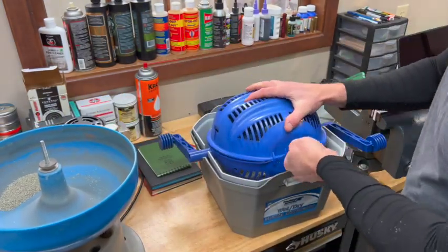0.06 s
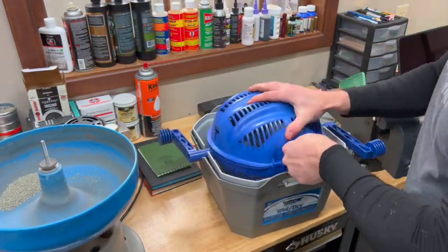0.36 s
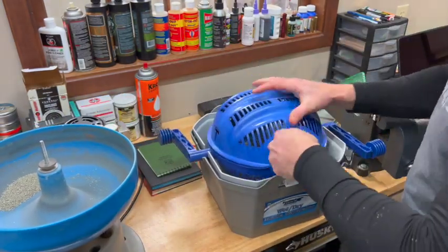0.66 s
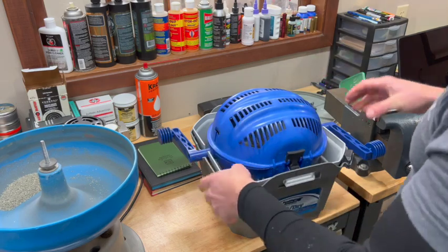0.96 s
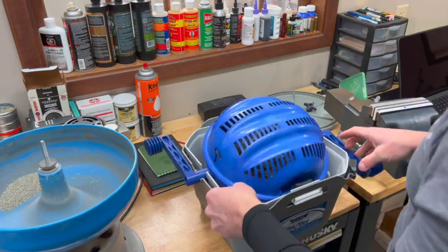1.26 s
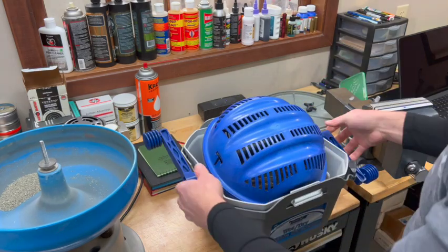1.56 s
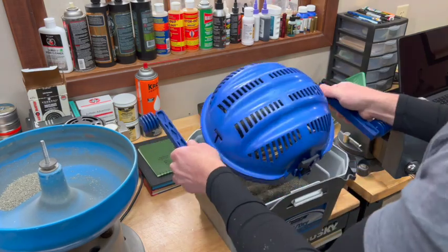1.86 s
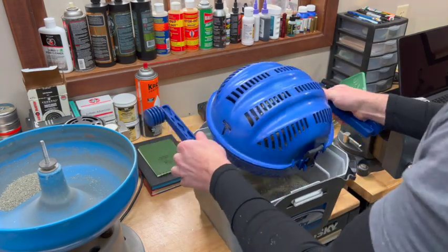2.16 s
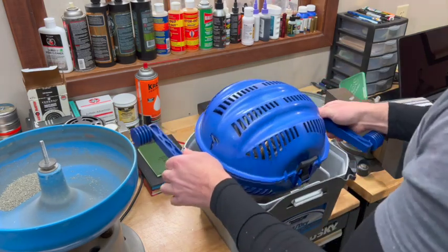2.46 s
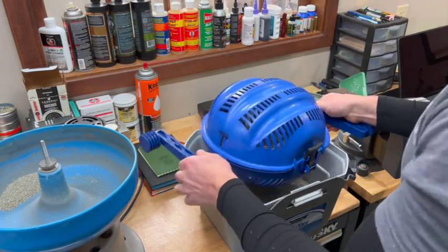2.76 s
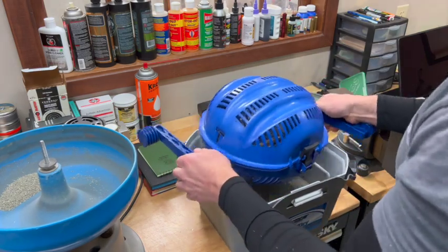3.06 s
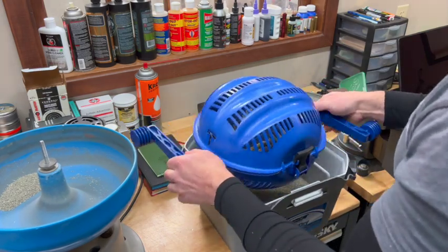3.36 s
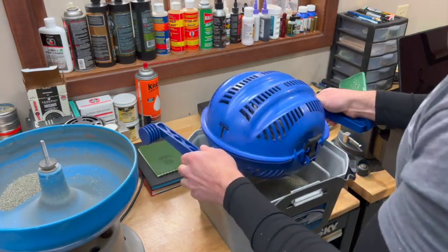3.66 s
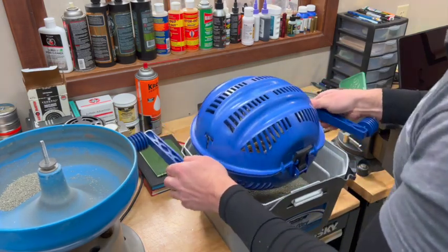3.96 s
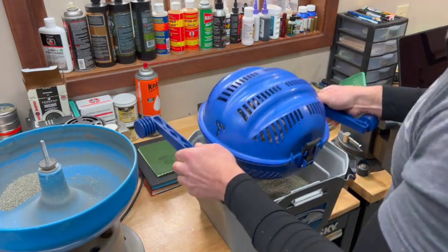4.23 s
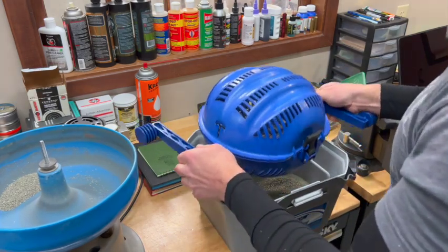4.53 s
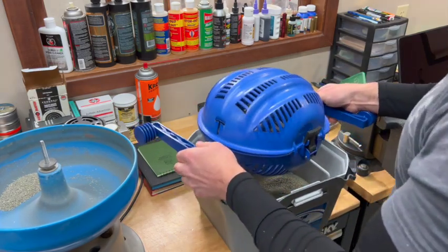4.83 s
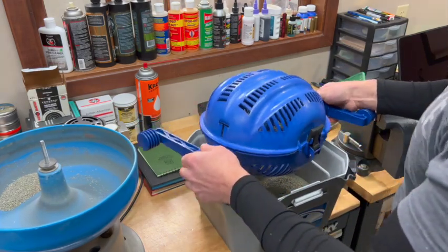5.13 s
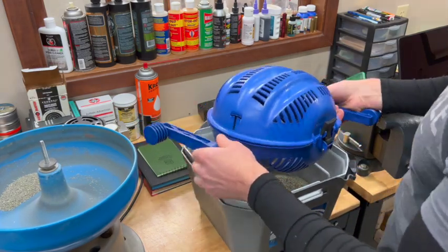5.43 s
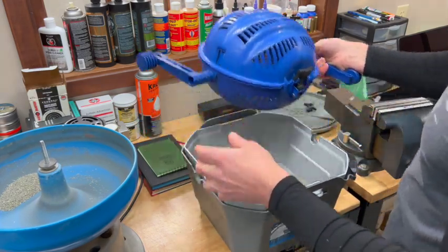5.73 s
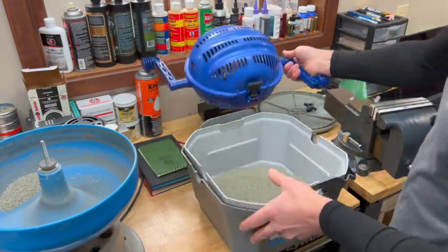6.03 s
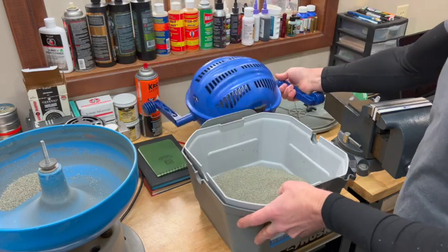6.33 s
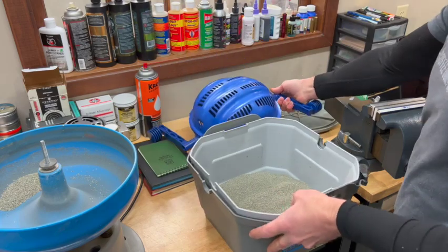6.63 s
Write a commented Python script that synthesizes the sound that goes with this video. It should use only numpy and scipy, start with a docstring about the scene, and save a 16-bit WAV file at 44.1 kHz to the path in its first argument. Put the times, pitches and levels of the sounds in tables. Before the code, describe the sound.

A plastic latch snaps, then brass cases rattle and clink in a turning plastic sifter, which is set down with a thump.

```python
"""Sifting brass cases

A slotted plastic ball full of brass cases is snapped shut, then turned and rocked above its bucket.
Its axles rub, the cases drum on the shell and clink together, and grit trickles out through the slots.
Then the ball is lifted off and set down on the workbench, bumping a lid that rings. Each hit is made of
fading tones or a short burst of noise. A small workshop echoes, with a faint fan hum behind it all."""
import sys
import numpy as np
from scipy import signal
from scipy.fft import rfft, irfft, next_fast_len
from scipy.io import wavfile

SR = 44100
rng = np.random.default_rng(int(sys.argv[2]) if len(sys.argv) > 2 else 0)


def to_wav(s):
    """Save 16-bit WAV."""
    ch = np.atleast_2d(s).T  # columns
    pcm = np.round(np.clip(ch, -1, 1) * 32767)  # PCM
    wavfile.write(sys.argv[1], SR, pcm.astype(np.int16))


N = 295012

# When things happen. All levels are relative: the functions turn them up or down.
# latch, cranks and ball knock on bucket and bench: t/s, then level/dB of clack, thump, hollow and snap
KNOCK_HITS = [(0.095, -39.5, -33, -38.5, -50), (0.325, -78, -43, -63, -85), (0.426, -20.5, -38, -30, -30.5),
              (0.599, -45, -41, -43.5, -66), (0.646, -42.5, -48, -50, -51), (0.987, -44.5, -52.5, -73, -70),
              (1.037, -47, -37.5, -47.5, -54.5), (1.322, -23, -57, -35.5, -57),
              (1.381, -23, -41, -33.5, -43), (1.703, -45, -34.5, -61, -54.5), (1.743, -39, -43, -71, -58),
              (1.84, -27, -36, -38, -43.5), (1.858, -30, -25, -19.5, -47), (3.046, -30, -28.5, -30, -49.5),
              (5.593, -38.5, -75, -56, -61.5), (5.655, -46.5, -78, -58, -53),
              (5.945, -30, -60, -49.5, -39.5), (6.067, -34, -39, -44, -32), (6.077, -26.5, -25.5, -40, -29),
              (6.092, -21, -23, -28, -24.5), (6.398, -29, -58, -59, -63), (6.535, -27.5, -63.5, -46, -68),
              (6.579, -25, -40, -36, -42.5), (6.62, -15, -13.5, -23, -30)]
# the axles turn in the bucket's notches: t/s, length/s, rub level/dB, rub growth/dB, grit level/dB
AXLE_TURNS = [(1.149, .29, -38.5, -0.5, -69.5), (1.69, .28, -47.5, 0, -78.5), (5.54, 0.47, -64, 9, -100),
              (5.914, 0.063, -50, -9, -97.5), (6.45, .23, -49.5, 15.5, -83)]
# how hard the heap of cases tumbles: t/s, level/dB
TUMBLE_CURVE = [(1.99, -45.5), (2.07, -38), (2.13, -21.5), (2.3, -28.5), (2.42, -20), (2.9, -26.5),
                (3.3, -23.5), (3.39, -27.5), (3.5, -24), (3.98, -21.5), (4.12, -24), (4.22, -36.5)]
# the loudest cases falling on the shell: t/s, ring level/dB, crack level/dB
CASE_FALLS = [(2.113, -41, -47), (2.133, -41, -36.5), (2.202, -40, -36.5), (2.264, -22.5, -36),
              (2.427, -22, -48), (2.473, -27, -38.5), (2.656, -19.5, -36.5), (2.757, -15, -30),
              (2.79, -17.5, -31), (2.839, -13.5, -37.5), (2.886, -19.5, -30.5), (2.912, -22, -49),
              (2.964, -15, -31), (3.002, -21, -37), (3.085, -17, -44), (3.108, -16, -37.5),
              (3.188, -12.5, -25), (3.264, -13.5, -36), (3.322, -19.5, -30.5), (3.34, -16, -36),
              (3.447, -16.5, -22.5), (3.534, -19, -36), (3.646, -13.5, -32), (3.682, -19, -36.5),
              (3.72, -23.5, -30.5), (3.743, -14, -34), (3.764, -16, -25.5), (3.891, -26, -35.5),
              (3.929, -18, -35.5), (4.082, -21.5, -31.5), (4.218, -25.5, -67.5), (4.291, -13.5, -36),
              (4.303, -27.5, -31), (4.314, -9.5, -24.5), (4.407, -26.5, -34), (4.487, -14, -21),
              (4.493, -9.5, -26.5), (4.507, -19.5, -31), (4.618, -15, -34), (4.652, -12, -26),
              (4.728, -21, -31), (4.784, -21.5, -48), (4.823, -20, -40.5), (4.864, -18, -40),
              (4.969, -16.5, -34.5), (4.982, -17, -27.5), (4.987, -13.5, -22), (5.078, -22, -48.5),
              (5.1, -21.5, -40), (5.354, -31.5, -63.5), (5.371, -29.5, -48), (5.414, -35.5, -52.5)]
# the brightest clinks of brass on brass: t/s, level/dB, f/Hz
CASE_CLINKS = [(2.1655, -27.5, 12000), (2.225, -26.5, 8000), (2.4598, -27.5, 11700), (2.6773, -23.5, 11600),
               (2.7112, -25, 11600), (2.807, -29.5, 11470), (2.8783, -20.5, 11600), (2.9637, -17, 11700),
               (2.9834, -23.5, 8020), (3.12, -32, 11730), (3.444, -28, 8030), (3.5533, -23.5, 11600),
               (3.6406, -31, 8050), (3.7349, -24.5, 11600), (3.8766, -25.5, 8060), (4.3244, -27, 11600),
               (4.4069, -29.5, 11600), (4.4244, -37.5, 11800), (4.4846, -26, 11600), (4.6039, -27, 11600),
               (4.6189, -25, 11600), (4.7316, -34, 11540), (4.7356, -39, 15600), (4.8115, -33.5, 11600),
               (4.9881, -31, 8040), (5.3727, -41.5, 8030), (5.4106, -45, 12200), (5.882, -41.5, 11600),
               (5.9484, -28, 8040), (6.5799, -45, 8070)]
# the ball bumps the lid: t/s, ring level/dB, bump level/dB
LID_HITS = [(6.092, -39.5, -38), (6.168, -35, -33.5)]

# Modes, the tones a thing rings with when hit: f/Hz, level/dB, t60/s (time to fade by 60 dB)
BENCH_MODES = [(86, -11, 0.14), (110.6, -16, 0.11), (146, -9.5, 0.16), (190, 4.5, 0.017)]
BUCKET_MODES = [(229, -2, 0.11), (268, -14.5, 0.18), (306, -6, 0.12), (383, 5.5, 0.051), (435, -5.5, 0.078),
                (474, -16, 0.011), (564, 4.5, 0.041), (682, 1.5, 0.033)]
SHELL_MODES = [(406.2, -11, 0.15), (616, -13.5, 0.1), (624.5, 2.5, 0.076), (727, -1.5, 0.075),
               (715.2, -11, 0.12), (773, -3.5, 0.08), (874, -9.5, 0.12), (1031, -8, 0.061),
               (1156, -5, 0.06), (1280, -3.5, 0.036), (1271, -9, 0.1), (1516, -12.5, 0.052),
               (1703, -5.5, 0.032), (1871, -12, 0.029), (2310, -26, 0.16), (2954, -24, 0.078),
               (3035, -23, 0.031)]
BRASS_MODES = [(8040, 2.5, 0.1), (8600, -14, .08), (11620, 8, 0.04), (12210, 3, .085), (15600, -2, 0.06)]
LID_MODES = [(616, -14, .9), (759, -19, .7), (1227, -16, .4), (1421, -14, .45), (1712, -14, .32),
             (1928, 3, .58), (2955, -9, .52), (4775, -21, .4)]

# Colours, how strong a sound is from bass to treble: f/Hz, level/dB
AIR_COLOUR = [(15, -57), (25, -10.5), (70, -6.5), (117, -6.5), (161, 3.5), (354, 10.5), (427, -10),
              (476, -3), (531, 2), (1260, -5.5), (2760, -15.5), (14400, -20.5), (16000, -18)]  # the room's steady hush
CLACK_COLOUR = [(300, -17), (800, 3), (1600, -2.5), (2300, -20.5), (3500, -26), (9000, -74.5)]  # the dull part of a plastic knock
SNAP_COLOUR = [(900, -77), (1800, 7.5), (2600, -2.5), (4800, 3), (7000, -2.5), (10000, -12.5), (16000, -18)]  # its bright part
LATCH_COLOUR = [(700, -14), (1200, 0), (1900, -6), (2400, 0), (3000, -2), (3600, -8), (4400, -2),
                (5400, -10), (6600, -24), (15000, -23)]  # the catch closing
AXLE_COLOUR = [(35, -65), (60, -20), (201, -4.5), (455, -1), (494, -5), (547, -1), (632, -4.5), (686, -4.5),
               (1170, -13.5), (3390, -30), (8000, -60), (10400, -49), (17600, -120)]  # an axle rubbing
GRIT_COLOUR = [(500, -19.5), (2000, -0.5), (5000, 4.5), (9000, -3), (15500, -2)]  # falling grains
CRACK_COLOUR = [(30, -59.5), (70, -46), (130, -11.5), (250, 8.5), (480, -3), (620, 0), (1700, 8.5),
                (2300, -5), (3100, 4.5), (4300, -8.5), (6300, -3), (9000, -13.5), (15500, -14.5)]  # brass on plastic
CHATTER_COLOUR = [(2000, -29.5), (6500, -4.5), (9500, -14.5), (11700, -12), (13000, -15.5), (16000, -17.5)]  # brass on brass
BUMP_COLOUR = [(40, 1), (130, -6), (700, 5.5), (2000, -4), (6000, -16.5), (15000, -41.5)]  # ball on lid
ECHO_COLOUR = [(40, -22.5), (200, 1.5), (600, 0), (1500, -2), (4800, -4), (7000, -4.5), (15000, -5.5)]  # the room's echo

# how long the workshop echoes: f/Hz, t60/s
ROOM_DECAY = [(100, 0.49), (700, 0.42), (2000, 0.64), (4800, 0.55), (8000, 0.4), (15000, 0.3)]

GRIP_S, SLIP_S = 0.019, 0.1  # a rub starts and dies away
SPILL_RISE_S, SPILL_FALL_S, SPILL_SHARE = 0.3, 0.27, 0.4  # grit runs fully for this share of a turn
ROLL_DB, TRICKLE_DB = -22, -37  # rubbing and grit that follow the tumble
DRUM_DB, TICK_DB, RIB_DB, JINGLE_DB = -10.5, -12, -12, -24  # small hits in the tumble
STRAY_RING_DB, STRAY_CRACK_DB = -4, -9.5  # lesser falls in the tumble
SURGES_PER_S, SURGE_DB = 14, 5
SETTLE_S, SETTLE_DB, SETTLE_DROP_DB = 0.11, -30.5, 15  # neighbours shift after a fall, ever more softly
ECHO_STEP_S, TOP_HZ = 0.4, 15900


def amp(db):
    """Turn decibels into a factor to multiply by."""
    return 10 ** (np.asarray(db) / 20)


def along(points, hz):
    """Read between (f/Hz, value) points, with octaves about evenly spaced."""
    f, values = np.transpose(points)
    return np.interp(np.log(hz + 1), np.log(f + 1), values)


def fade(t, t60):
    """Die away by 60 dB every t60 seconds."""
    return np.exp(-np.log(1000) * t / t60)


def colour(x, spectrum):
    """Give x the bass and treble of a colour table."""
    m = next_fast_len(len(x) + 4096)
    gain = amp(along(spectrum, np.fft.rfftfreq(m, 1 / SR)))
    return irfft(rfft(x, m) * gain, m)[:len(x)]


def noise(spectrum):
    """Coloured noise with an average strength (rms) of 1."""
    x = colour(rng.standard_normal(N), spectrum)
    return x / np.sqrt(np.mean(x ** 2) + 1e-20)


def highpass(x, hz):
    """Cut the bass that a thing is too small to give off."""
    return signal.sosfilt(signal.butter(4, hz, "highpass", fs=SR, output="sos"), x)


def add(track, start, sound):
    """Mix a sound into the track, start seconds in."""
    part = track[max(round(start * SR), 0):][:len(sound)]
    part += sound[:len(part)]


def pulses(times, sizes):
    """One sharp click for each hit."""
    return np.bincount(np.maximum(np.asarray(times) * SR, 0).astype(int), sizes, N)[:N]


def bursts(times, sizes, spectrum, t60, rise):
    """Each hit starts a quickly dying puff of coloured noise."""
    t = np.arange(SR // 2) / SR
    shape = fade(t, t60) * (1 - np.exp(-t / rise))
    power = signal.fftconvolve(pulses(times, sizes ** 2), shape ** 2)[:N]
    return np.sqrt(np.abs(power)) * noise(spectrum)


def ring(times, sizes, modes, scatter_db, detune=0, tunings=1):
    """Each hit rings every mode with a random sign and strength, in one of the tunings."""
    spot = rng.standard_normal((len(times), len(modes), 2))
    drive = sizes[:, None] * np.sign(spot[..., 0]) * amp(scatter_db * np.tanh(spot[..., 1]))
    out = np.zeros(N)
    for group, shift in enumerate(np.linspace(-detune, detune, tunings)):
        for k, (hz, db, t60) in enumerate(modes):
            decay, angle = fade(1 / SR, t60), 2 * np.pi * hz * (1 + shift) / SR
            blows = pulses(times[group::tunings], drive[group::tunings, k])
            feedback = [1, -2 * decay * np.cos(angle), decay * decay]  # turns a click into a fading tone
            out += signal.lfilter([0, amp(db) * decay * np.sin(angle)], feedback, blows + 1e-20)
    return out


def rebounds(times, sizes, count, within, drop_db):
    """Times and sizes of the hops after each hit: the later, the weaker."""
    late = rng.random((len(times), count))
    hop_times = times[:, None] + 0.002 + within * late
    hop_sizes = sizes[:, None] * amp(-drop_db * late)
    return hop_times.ravel(), hop_sizes.ravel()


def stroke(start, length, db, growth_db, attack, release):
    """A level curve (t/s, level/dB) that rises by 30 dB, runs on, then drops by 30 dB."""
    end, end_db = start + length, db + growth_db
    return [(start - attack, db - 30), (start, db), (end, end_db), (end + release, end_db - 30)]


def jostle(curve, count, spread_db):
    """Times and sizes of random hits that follow a level curve."""
    t, db = np.transpose(curve)
    gain = amp(np.interp(np.arange(N) / SR, t, db, left=-120, right=-120))
    when, softness = rng.random((count, 2)).T
    times = t[0] + when * (t[-1] - t[0])
    samples = np.minimum(times * SR, N - 1).astype(int)
    return times, gain[samples] * amp(-spread_db * softness)


def room_air():
    """Still air with the faint hum of a fan."""
    hum = np.sin(2 * np.pi * np.outer([120, 480], np.arange(N) / SR)).sum(0)
    return amp(-65.5) * noise(AIR_COLOUR) + amp(-73) * hum


def knocks():
    """Plastic knocks: a thump in the bench, the hollow bucket, a rattling clack and a snap."""
    times, clack_db, thump_db, hollow_db, snap_db = np.transpose(KNOCK_HITS)
    thump = amp(-4.5) * highpass(ring(times, amp(thump_db), BENCH_MODES, scatter_db=1.5), hz=68)
    hollow = amp(-6) * highpass(ring(times, amp(hollow_db), BUCKET_MODES, scatter_db=5.5), hz=157)
    clack = amp(-5) * bursts(times, amp(clack_db), CLACK_COLOUR, t60=0.04, rise=0.00051)
    hops = rebounds(times, amp(clack_db), count=2, within=0.012, drop_db=2.5)
    rattle = amp(-7.5) * bursts(*hops, CLACK_COLOUR, t60=0.018, rise=0.00025)
    snap = amp(1) * bursts(times, amp(snap_db), SNAP_COLOUR, t60=0.032, rise=0.0016)
    return thump + hollow + clack + rattle + snap


def latch():
    """The catch springs over its lip with a dry plastic crack."""
    return bursts(times=[0.4255], sizes=amp([-18.5]), spectrum=LATCH_COLOUR, t60=0.027, rise=0.00013)


def axles():
    """The axles turn in their notches in a fast run of small slips, scratching over trapped dust."""
    turns = [stroke(start, length, db, growth_db, GRIP_S, SLIP_S)
             for start, length, db, growth_db, _ in AXLE_TURNS]
    slips = np.hstack([jostle(turn, count=260, spread_db=9.5) for turn in turns])
    rub = amp(0.5) * bursts(*slips, AXLE_COLOUR, t60=0.026, rise=0.00081)
    rolling = jostle(TUMBLE_CURVE, count=900, spread_db=7.5)
    rub += amp(ROLL_DB) * bursts(*rolling, AXLE_COLOUR, t60=0.028, rise=0.0012)
    dust = np.hstack([jostle(turn, count=60, spread_db=14) for turn in turns])
    return rub + amp(-14.5) * ribs(*dust, hz=3790, octaves=0.51, t60=0.011)


def ribs(times, sizes, hz, octaves, t60):
    """Plastic ribs and edges come in many lengths, so each hit ticks at its own pitch."""
    pitch = hz * 2 ** (octaves * rng.uniform(-1.01, 1, (len(times), 1)))
    t = np.arange(SR // 40) / SR
    ticks = sizes[:, None] * np.sin(2 * np.pi * pitch * t) * fade(t, t60)
    samples = (times[:, None] * SR).astype(int) + np.arange(len(t))
    return highpass(np.bincount(samples.ravel(), ticks.ravel(), N)[:N], hz=1580)


def grit():
    """Fine grains patter through the slots in spurts, at each turn and all through the tumbling."""
    spills = []
    for start, length, _, _, db in AXLE_TURNS:
        full_at = start + length * (1 - SPILL_SHARE) / 2
        flow = stroke(full_at, length * SPILL_SHARE, db, 0, SPILL_RISE_S, SPILL_FALL_S)
        spills.append(jostle(flow, count=6000, spread_db=9))
    times, sizes = jostle(TUMBLE_CURVE, count=16000, spread_db=30)
    times, sizes = np.hstack(spills + [(times, amp(TRICKLE_DB) * sizes)])
    steps = np.arange(0, N, SR // 60) / SR
    spurts = amp(3 * np.interp(times, steps, rng.standard_normal(len(steps))))
    grains = pulses(times, sizes * spurts * rng.standard_normal(len(times)))
    return amp(23.5) * colour(grains, GRIT_COLOUR)


def surging(curve):
    """The heap slips unevenly: add random rises and dips to its level curve."""
    times, db = np.transpose(curve)
    steps = np.arange(0, N / SR, 1 / SURGES_PER_S)
    surge = np.tanh(rng.standard_normal(N // 1000))[:len(steps)]
    t = np.linspace(times[0], times[-1], 500)
    return np.column_stack([t, np.interp(t, times, db) + SURGE_DB * np.interp(t, steps, surge)])


def heap():
    """The load tumbles in surges of lesser falls and many small hits, some of them brass on brass."""
    flow = surging(TUMBLE_CURVE)
    times, sizes = jostle(flow, count=36, spread_db=1.5)
    small_times, small_sizes = jostle(flow, count=520, spread_db=14)
    body = shell((times, amp(STRAY_RING_DB) * sizes), (small_times, amp(DRUM_DB) * small_sizes))
    strays = amp(STRAY_CRACK_DB) * bursts(times, sizes, CRACK_COLOUR, t60=0.038, rise=0.00023)
    taps = jostle(flow, count=220, spread_db=23)
    ticks = amp(TICK_DB) * bursts(*taps, CRACK_COLOUR, t60=0.037, rise=0.0001)
    rib_taps = jostle(flow, count=450, spread_db=27)
    ticks += amp(RIB_DB) * ribs(*rib_taps, hz=3280, octaves=0.97, t60=0.011)
    jingle = amp(JINGLE_DB) * brass(*jostle(flow, count=130, spread_db=21))
    return body + highpass(strays + ticks, hz=257.7) + jingle


def shell(*hits):
    """The hollow ball rings; the shifting load detunes it, and air slipping out thins the bass."""
    times, sizes = np.hstack(hits)
    return highpass(ring(times, sizes, SHELL_MODES, scatter_db=1.5, detune=0.016, tunings=4), hz=495)


def brass(times, sizes):
    """The cases are not quite in tune with each other, and each hit favours different modes."""
    return ring(times, sizes, BRASS_MODES, scatter_db=9, detune=0.003, tunings=3)


def falls():
    """Single cases crack against the shell, make it ring and hop; then their neighbours settle."""
    times, ring_db, crack_db = np.transpose(CASE_FALLS)
    hops = rebounds(times, amp(ring_db - 15), count=3, within=0.02, drop_db=12)
    settling = rebounds(times, amp(ring_db + SETTLE_DB), count=4, within=SETTLE_S, drop_db=SETTLE_DROP_DB)
    body = shell((times, amp(ring_db - 9)), hops, settling)
    crack = amp(4.5) * bursts(times, amp(crack_db), CRACK_COLOUR, t60=0.053, rise=0.00038)
    crack_hops = rebounds(times, amp(crack_db), count=3, within=0.05, drop_db=10)
    crack += amp(-4) * bursts(*crack_hops, CRACK_COLOUR, t60=0.014, rise=0.0001)
    rib_hops = rebounds(times, amp(crack_db), count=5, within=0.033, drop_db=17)
    ticks = amp(5) * ribs(*rib_hops, hz=3250, octaves=0.8, t60=0.0091)
    return body + highpass(crack, hz=361) + ticks


def clinks():
    """A struck case rings hard on one tone until its neighbours damp it; other tones linger."""
    times, db, _ = np.transpose(CASE_CLINKS)
    pings, t = np.zeros(N), np.arange(SR // 4) / SR
    for start, level_db, hz in CASE_CLINKS:
        add(pings, start, amp(level_db) * np.sin(2 * np.pi * hz * t) * fade(t, 0.077))
    linger = amp(-19.5) * brass(*rebounds(times, amp(db), count=2, within=0.019, drop_db=21.5))
    chatter = amp(-11) * bursts(times, amp(db), CHATTER_COLOUR, t60=0.032, rise=0.0001)
    return amp(-5) * pings + linger + chatter


def lid():
    """The swinging ball softly bumps a lid, which rings on."""
    times, ring_db, bump_db = np.transpose(LID_HITS)
    ding = ring(times, amp(ring_db), LID_MODES, scatter_db=0)
    return ding + bursts(times, amp(bump_db), BUMP_COLOUR, t60=0.26, rise=0.0028)


def workshop(x):
    """The workshop's diffuse echo: each pitch dies away at its own speed."""
    out, step = np.zeros(N), round(ECHO_STEP_S * SR)
    for start in range(0, N, step):  # a fresh random tail for each stretch
        hz, t, bands = signal.stft(rng.standard_normal(SR * 2 // 3), SR, nperseg=256)
        bands *= fade(t, along(ROOM_DECAY, hz)[:, None])
        _, tail = signal.istft(bands, SR, nperseg=256)
        tail = colour(tail / np.linalg.norm(tail), ECHO_COLOUR)
        add(out, start / SR + 0.005, signal.fftconvolve(x[start:start + step], tail))
    return out


def scene():
    """All the handling, its echo and the room's air, in one channel."""
    near = knocks() + latch() + axles() + grit() + heap() + falls() + clinks() + lid()
    return (near + amp(-7.5) * workshop(near) + room_air())[None]


def record(dry):
    """Cut off all treble above TOP_HZ."""
    m = next_fast_len(N + SR // 4)
    passes = np.fft.rfftfreq(m, 1 / SR) < TOP_HZ
    return irfft(rfft(dry, m) * passes, m)[:, :N]


dry = scene()
out = record(dry)
to_wav(out)
```